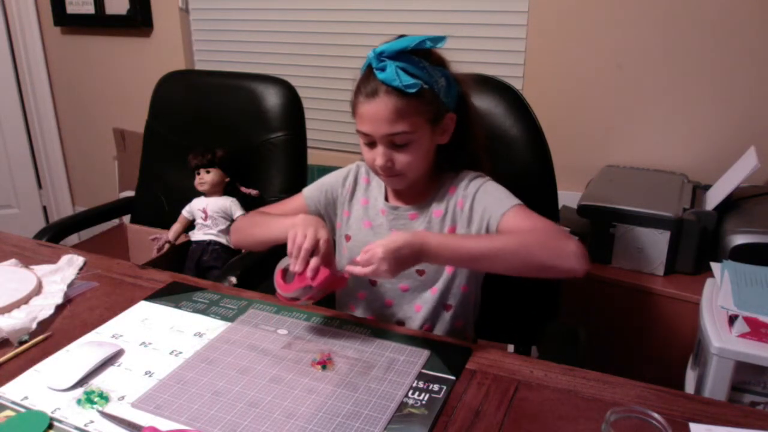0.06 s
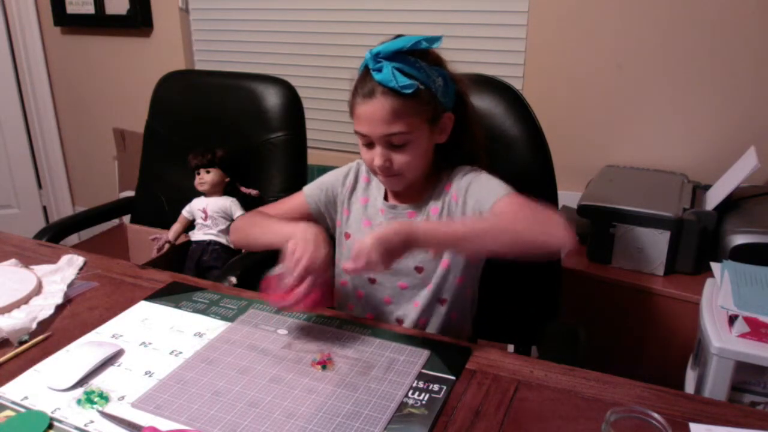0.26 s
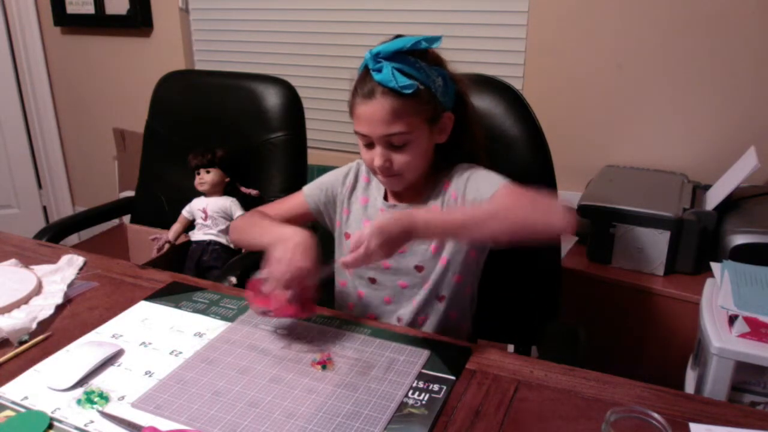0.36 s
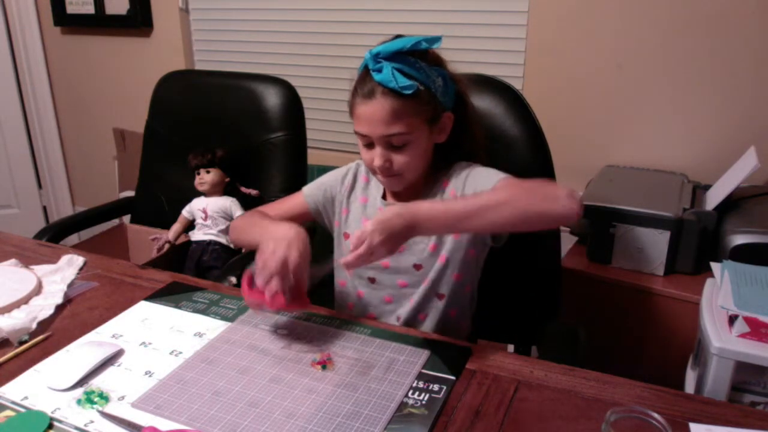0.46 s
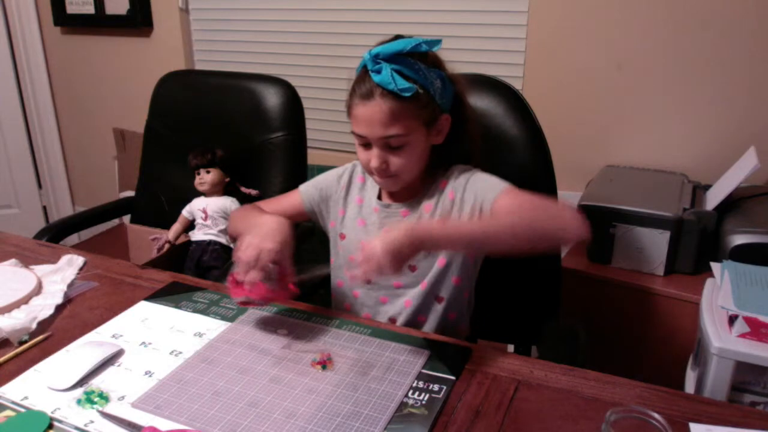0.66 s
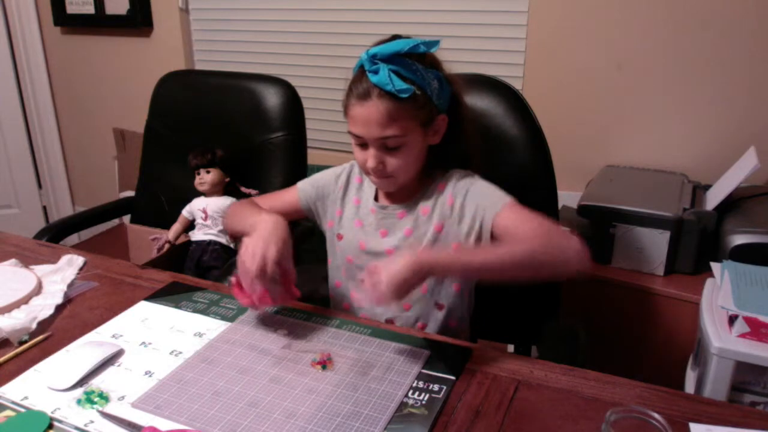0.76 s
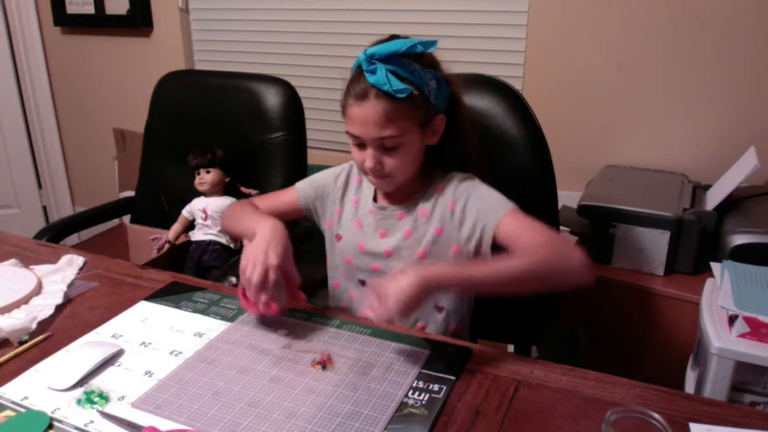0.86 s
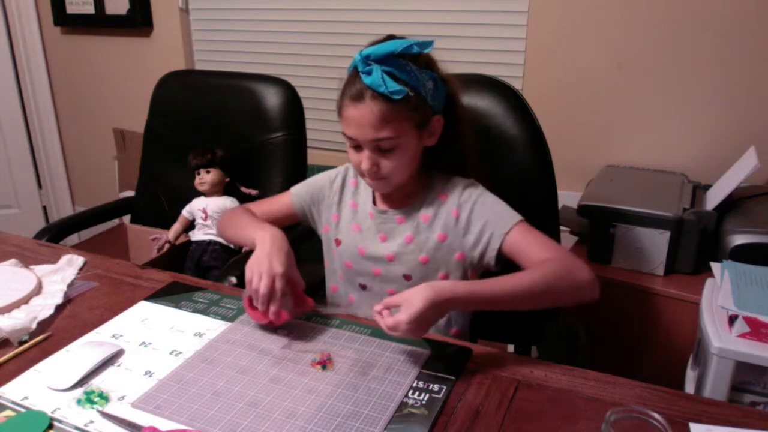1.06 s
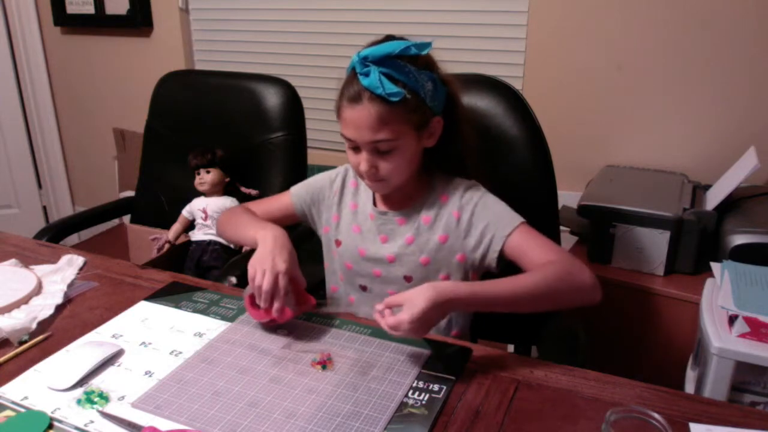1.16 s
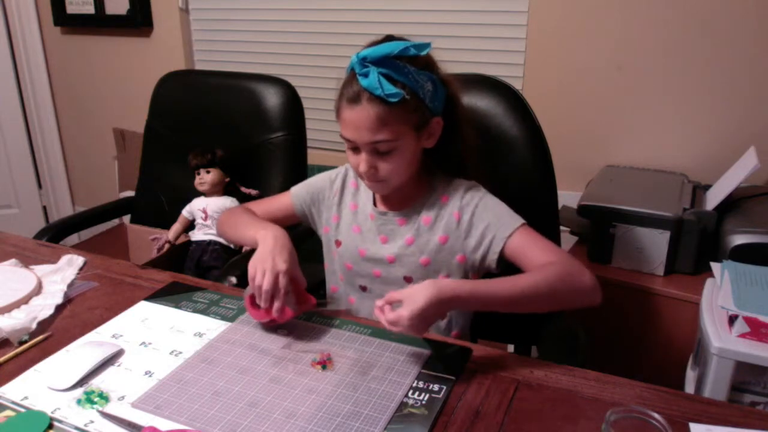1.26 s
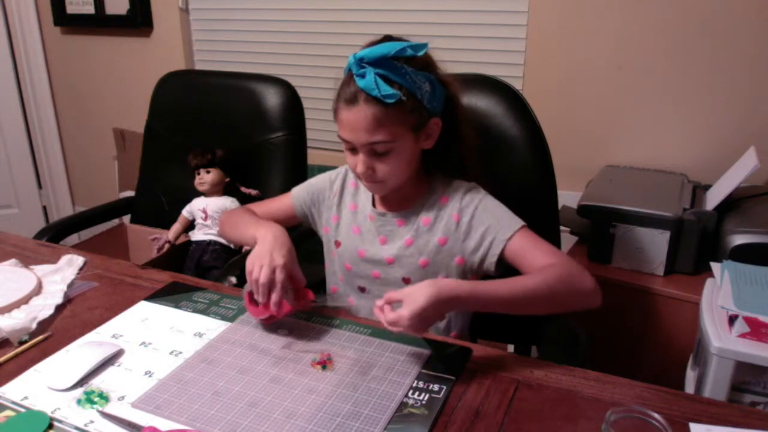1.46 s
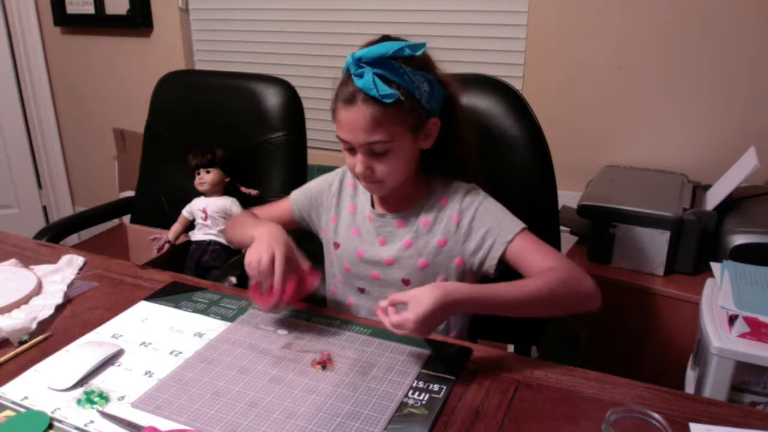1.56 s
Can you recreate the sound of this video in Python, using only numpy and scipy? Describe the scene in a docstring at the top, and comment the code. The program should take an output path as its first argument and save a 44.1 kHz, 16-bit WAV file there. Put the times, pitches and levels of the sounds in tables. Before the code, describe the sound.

Adhesive tape is jerked off a plastic dispenser and snaps off in a small room.

```python
"""Adhesive tape is jerked off a handheld plastic dispenser at a table in a small room.
Fingers rub faintly over room air and hum. The tape starts to unstick with two sharp ticks, then peels
in a dense run of tiny slips that ring film, roll and shell: one long pull, then short tugs. Two
clusters of crackling snaps follow as the taut strip meets the cutter and tears off. Throughout, the
table and walls echo the tape, and the loudest peaks overload the microphone."""
import sys
import numpy as np
from scipy import signal
from scipy.fft import rfft, irfft
from scipy.io import wavfile
from scipy.ndimage import uniform_filter1d

SR = 44100
rng = np.random.default_rng(int(sys.argv[2]) if len(sys.argv) > 2 else 0)


def dump(signal):
    """Clip the signal to [-1, 1] and save it as 16-bit WAV at the path in sys.argv[1]."""
    limited = np.clip(np.atleast_2d(signal).T, -1, 1)
    pcm = np.round(limited * 32767).astype(np.int16)
    wavfile.write(sys.argv[1], SR, pcm)


N = 70560

# The hollow ring of the dispenser's plastic shell. Each row: pitch in Hz, width in Hz, level in dB.
SHELL_MODES = [(714, 370, -7), (1456, 120, -6), (1870, 380, 0), (2325, 417, -6)]


def undb(db):
    """Decibels to gain."""
    return 10 ** (np.asarray(db) / 20)


def unit(x):
    """Scale to an rms of one."""
    return x / np.sqrt(np.mean(x ** 2) + 1e-18)


def lookup(points, hz):
    """Read a table of (Hz, value) on a log-frequency axis."""
    freqs, values = np.array(points, float).T
    return np.interp(np.log(hz + 1e-3), np.log(freqs), values)


def convolve(x, response):
    """Pass a sound through an impulse response."""
    return signal.fftconvolve(x, response)[:N]


def colour(x, points, size=4096):
    """Shape the tone with an EQ curve of (Hz, dB), as a causal filter of unit energy."""
    hz = np.arange(size // 2 + 1) * SR / size
    cepstrum = irfft(np.log(undb(lookup(points, hz))))
    cepstrum[1:size // 2] *= 2  # minimum phase keeps the attacks crisp
    cepstrum[size // 2 + 1:] = 0
    response = irfft(np.exp(rfft(cepstrum)))
    return convolve(x, response / np.linalg.norm(response))


def resonate(x, hz, width_hz):
    """One resonance with gain one at its centre."""
    return signal.lfilter(*signal.iirpeak(hz, hz / width_hz, fs=SR), x)


def band(x, hz, width_hz):
    """A steeper band: the same resonance twice, scaled to an rms of one."""
    return unit(resonate(resonate(x, hz, width_hz), hz, width_hz))


def ring(x, modes):
    """A body with several short, broad resonances."""
    return sum(undb(db) * resonate(x, hz, width) for hz, width, db in modes)


def gate(start, length, attack_s, release_s=0.0017):
    """Attack, hold and short release of a stroke."""
    age = np.arange(N) / SR - start
    return np.clip(age / attack_s, 0, 1) * np.exp(-np.maximum(age - length, 0) / release_s)


def room_tone(air_db=-64):
    """A bed of quiet room air with a faint hum and whine."""
    # The dark tone of the air. Each row: frequency in Hz, relative level in dB.
    air_eq = [(30, -14), (60, -5.5), (130, 1), (200, -13), (400, -8.5), (800, -18), (1700, -19),
              (3000, -21), (8000, -26.5), (15000, -38)]
    # Steady hum in the room. Each row: pitch in Hz, rms level in dB.
    hum_tones = [(60, -89), (120, -73.5), (242, -74.5), (1358, -73), (2126, -82)]
    t = np.arange(N) / SR
    hum = sum(undb(db) * np.sqrt(2) * np.sin(2 * np.pi * (hz * t + rng.random())) for hz, db in hum_tones)
    air = unit(colour(rng.standard_normal(N), air_eq))
    return undb(air_db) * air + hum


def diffuse_tail(onset_s=.0012, build_s=0.0073):
    """One reverb response of the walls; it dies soonest in the bass and the top treble."""
    # The room's decay. Each row: frequency in Hz, seconds to fall by 60 dB.
    decay_times = [(200, 0.221), (800, 0.33), (2100, 0.36), (5500, 0.4), (11000, 0.31), (15000, 0.26)]
    t = np.arange(N // 2) / SR
    hz = np.arange(len(t) // 2 + 1) * SR / len(t)
    spectrum = rfft(rng.standard_normal(len(t)))
    tail = 0
    for centre, t60 in decay_times:
        share = lookup([(f, f == centre) for f, _ in decay_times], hz)  # overlapping bands
        tail = tail + irfft(spectrum * share, len(t)) * np.exp(-np.log(1000) * t / t60)
    tail = tail * np.clip((t - onset_s) / build_s, 0, 1)
    return tail / np.linalg.norm(tail)


def room(x, reverb_db=-1.5, crossfade_s=.025):
    """Direct sound, close echoes and a diffuse tail that keeps changing as the hands move."""
    # Early echoes off the table and nearby things. Each row: delay in seconds, level in dB.
    echoes = [(.0027, -7), (.0078, -12.5)]
    close = sum(undb(db) * np.pad(x, (int(delay * SR), 0))[:N] for delay, db in echoes)
    turn = np.pi / 2 * np.arange(N) / SR / crossfade_s  # swings the send between two tails
    walls = convolve(x * np.cos(turn), diffuse_tail()) + convolve(x * np.sin(turn), diffuse_tail())
    return x + close + undb(reverb_db) * walls


def handling(bump_rise_s=.008):
    """Fingers rub on the tape; hands, arms and dispenser bump softly."""
    # Soft rubs. Each row: start and length in seconds, level in dB, centre and width in Hz.
    rub_strokes = [(-.01, 0.021, -49.5, 5770, 4000), (-.01, .04, -62, 1897, 2466),
                   (0.179, .038, -48, 10650, 5110), (1.497, 0.0092, -57.5, 9910, 6000)]
    # Dull bumps. Each row: start in seconds, level in dB.
    bump_hits = [(0.181, -63), (0.496, -39), (.578, -49.5), (0.784, -45.5), (0.959, -58.5), (1.35, -61.5)]
    t = np.arange(N) / SR
    noise = rng.standard_normal(N)
    rubs = sum(undb(db) * gate(start, length, attack_s=.013) * band(noise, hz, width)
               for start, length, db, hz, width in rub_strokes)
    bump_envelope = 0
    for start, db in bump_hits:
        age = np.maximum(t - start, 0) / bump_rise_s
        bump_envelope = bump_envelope + undb(db) * age * np.exp(1 - age)
    return rubs + bump_envelope * band(noise, hz=135, width_hz=120)


def ticks_and_snaps(decay_s=0.0015):
    """Each tick or snap is a millisecond crackle that rings the strip and the plastic shell."""
    # Two ticks as the tape starts to unstick, then the snaps at the cutter. Each row: start in
    # seconds, level in dB, strip ring and shell ring in dB relative to the crack, low cut in Hz.
    hits = [(.2192, -21, -20, 12, 2080), (.227, -8.5, -1, -3.5, 1790), (0.7737, -8.5, -16, 5, 600),
            (0.7829, -4, -29, -4, 600), (.790, -3, -20, -5.5, 545), (1.0587, -0.5, -12, -7, 651),
            (1.065, -1, -4, -3.5, 468), (1.0709, -4.5, 8, -1.5, 450), (1.078, -4, -7.5, -1.5, 440)]
    # The bright tone of a crack. Each row: frequency in Hz, relative level in dB.
    crack_eq = [(100, -52.5), (380, -39), (700, -11), (1500, -5.5), (3100, -5), (5500, -1.5), (8500, -0.5),
                (12000, 4), (15800, 1)]
    # The thin ring of the strip. Each row: pitch in Hz, width in Hz, level in dB.
    strip_modes = [(4340, 550, 0.5), (5920, 400, -0.5), (8300, 180, -4.5), (11100, 650, 3), (12130, 500, 0)]
    t = np.arange(N) / SR
    grit = colour(rng.choice([-1., 1.], N), crack_eq)
    out = 0
    for start, db, strip_db, shell_db, low_hz in hits:
        crack = undb(db) * grit * (t >= start) * np.exp(-np.abs(t - start) / decay_s)
        strip = undb(strip_db) * ring(crack, strip_modes)
        shell = undb(shell_db) * ring(crack, SHELL_MODES)
        low_cut = signal.butter(4, low_hz, "high", fs=SR, output="sos")
        out = out + signal.sosfilt(low_cut, crack + strip + shell + 1e-18)
    return out


def peel(slip_hz=3222, jitter=.4, scatter_db=3, hub_db=-34.5, shell_db=-5.5):
    """The glue lets go in uneven slips, tiny clicks that ring film, roll and shell; the hub rumbles."""
    # Pulls on the tape. Each row: start and length in seconds, opening level in dB, swell over
    # the pull in dB, film ring and roll ring in dB relative to the rasp.
    pulls = [(0.232, 0.0071, -3.5, 2.5, -11.5, -11.5), (0.237, 0.088, -8.5, 5.5, -10, -12.5),
             (0.339, 0.026, -8, -6, -8.5, -22), (0.4936, 0.0035, 0, -4.5, -11, -12),
             (0.5, 0.017, -12, -4, -4, -19), (0.5383, 0.00054, -7, 3, -0.5, -17.5),
             (0.542, 0.0037, -5.5, 8, -36.5, -15), (.577, 0.0032, -4.5, 2.5, -15.5, -23)]
    # The sizzling tone of a slip. Each row: frequency in Hz, relative level in dB.
    slip_eq = [(100, -38.5), (400, -16), (1000, -14.5), (1700, -13), (2700, -16.5), (4800, -7),
               (7500, -3.5), (10300, -1), (13000, 1.5), (15800, -2.5)]
    t = np.arange(N) / SR
    gap, size, polarity = rng.standard_normal((N // 8, 3)).T
    onsets = (np.cumsum(np.exp(jitter * gap)) * SR / slip_hz).astype(int)
    clicks = np.sign(polarity) * undb(scatter_db * size)
    slips = np.bincount(onsets[onsets < N], clicks[onsets < N], N)
    rasp = unit(colour(slips, slip_eq))
    film = unit(resonate(rasp, hz=9980, width_hz=2300))
    roll = unit(resonate(rasp, hz=2805, width_hz=760))
    hub = undb(hub_db) * band(slips, hz=151, width_hz=230)  # the roll turning on its hub
    tape = 0
    for start, length, db, swell_db, film_db, roll_db in pulls:
        progress = np.clip((t - start) / length, 0, 1)
        force = gate(start, length, attack_s=.0005) * undb(db + swell_db * progress)
        tape = tape + force * (rasp + hub + undb(film_db) * film + undb(roll_db) * roll)
    return tape + undb(shell_db) * ring(tape, SHELL_MODES)


def scene():
    """Tape and hands echo in the room, over the room tone."""
    return (room(peel() + ticks_and_snaps() + handling()) + room_tone())[None]


def overload(x, knee=14):
    """The microphone rounds off the loudest peaks; a higher knee clips harder."""
    oversampled = signal.resample_poly(x, 2, 1, axis=-1)
    clipped = oversampled / (1 + np.abs(oversampled) ** knee) ** (1 / knee)
    return signal.resample_poly(clipped, 1, 2, axis=-1)


def suppress(x, half_open_db=-67.5, depth_db=-15, treble_hz=4050, size=512):
    """A noise suppressor turns down the treble wherever it has become faint."""
    hz, _, spectra = signal.stft(x, SR, nperseg=size)
    power = uniform_filter1d(np.abs(spectra) ** 2, size=13, axis=-2)  # smoothed across frequency
    faint = 1 / (1 + np.abs(power) / undb(half_open_db) ** 2)
    cut_db = depth_db * faint * (hz / (hz + treble_hz))[:, None]
    return signal.istft(spectra * undb(cut_db), SR, nperseg=size)[1][..., :N]


def record(dry, low_cut_hz=42, top_hz=15750):
    """The microphone overloads; the recorder cuts rumble, faint hiss and the very top."""
    low_cut = signal.butter(2, low_cut_hz, "high", fs=SR, output="sos")
    high_cut = signal.ellip(8, .1, 50, top_hz, fs=SR, output="sos")
    lean = signal.sosfilt(low_cut, overload(dry))
    return signal.sosfiltfilt(high_cut, suppress(lean))


dry = scene()
out = record(dry)
dump(out)
```